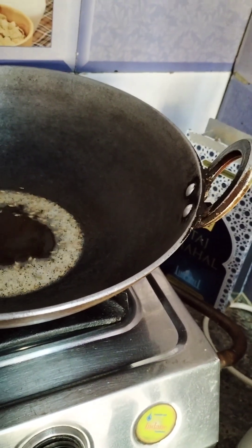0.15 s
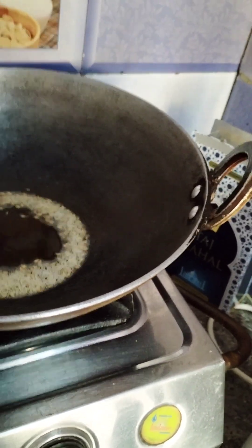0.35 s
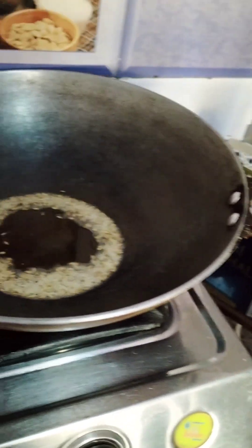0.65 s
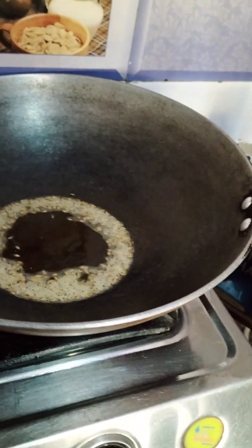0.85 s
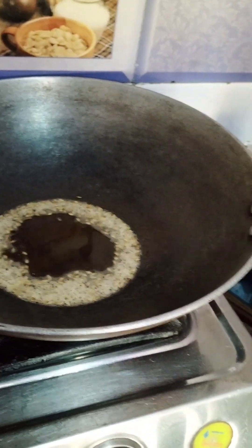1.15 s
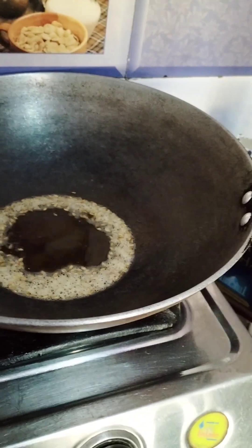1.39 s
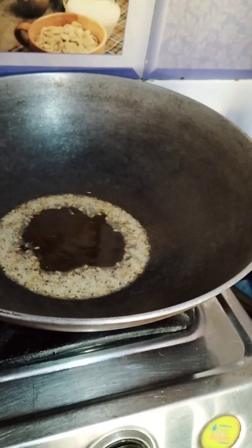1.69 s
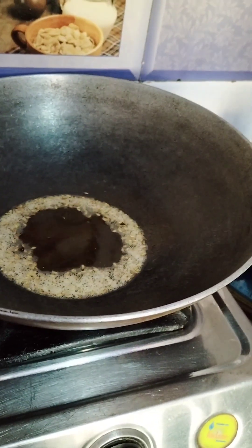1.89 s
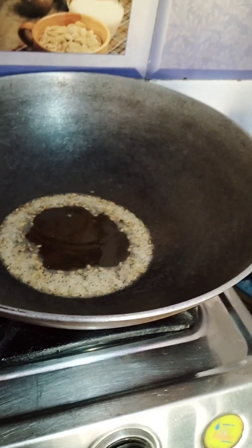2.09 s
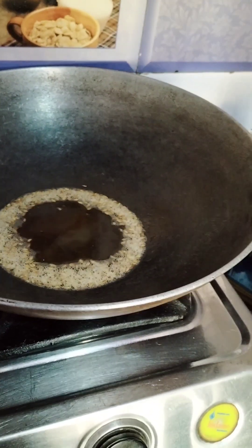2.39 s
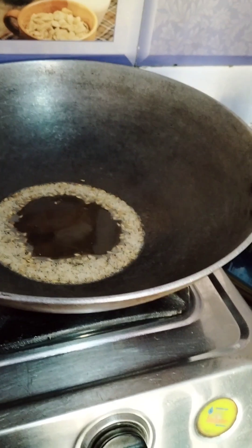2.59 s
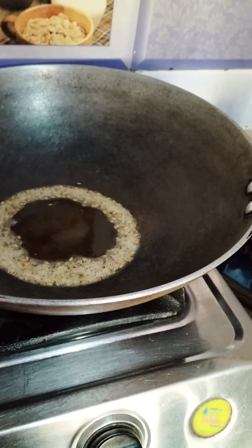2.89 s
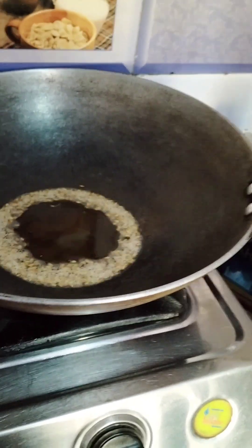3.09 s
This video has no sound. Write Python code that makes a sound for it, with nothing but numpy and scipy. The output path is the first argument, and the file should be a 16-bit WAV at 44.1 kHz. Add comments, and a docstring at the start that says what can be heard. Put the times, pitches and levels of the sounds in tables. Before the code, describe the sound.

Seeds pop and sputter in hot oil in a wide metal pan, lightly at first, then with sudden loud snaps and dull pan knocks, over soft hiss and a faint motor buzz, close phone microphone in a kitchen.

```python
"""Seeds pop in hot oil in a wide metal pan on a steel stove, close to a phone in a kitchen.
Throughout: shaped noise hisses for oil, burner and room, motor orders buzz, deep tones throb.
Light pops come first: clicks and noise sputter through pan resonances, with puffs of high droplet hiss.
A faint jolt at 0.25 s rings pan and stove modes over a noise thud; dull noise blips sound from 1.15 to 2.7 s.
Loud pops start at 1.2 s, stronger jolts at 1.38 s; loud pops return at 2.8 s, the hardest knocks from 2.9 s."""
import sys
import numpy as np
from scipy import signal
from scipy.fft import rfft, irfft, next_fast_len
from scipy.io import wavfile
from scipy.ndimage import uniform_filter1d, map_coordinates

SR = 44100
rng = np.random.default_rng(int(sys.argv[2]) if len(sys.argv) > 2 else 0)


def gain_from_db(level_db):
    """Turn a decibel level (scalar or array-like) into a linear amplitude factor."""
    decades = np.asarray(level_db, float) / 20
    return 10 ** decades


def inscribe(sig):
    """Save sig as 16-bit PCM at rate SR to the path in sys.argv[1].

    A 1-D sig is mono; a 2-D sig holds one channel per row.
    Samples are clipped to [-1, 1] before scaling.
    """
    pcm = np.round(np.clip(np.atleast_2d(sig).T, -1, 1) * 32767)
    wavfile.write(sys.argv[1], SR, pcm.astype(np.int16))


N = 143325


def unit(x):
    """Scale each row to rms 1."""
    return x / np.sqrt(np.mean(x ** 2, -1, keepdims=True) + 1e-20)


def along(points, hz):
    """Read a curve of (Hz, value) points on a log frequency axis."""
    f, v = np.transpose(points)
    return np.interp(np.log(hz + 1), np.log(f + 1), v)


def wobble(rate, count, size):
    """Rows of random drift: straight lines between normal draws, rate knots a second."""
    knots = rng.standard_normal((count, int(size * rate / SR) + 4))
    position = np.arange(size) * rate / SR
    return np.array([map_coordinates(k, [position], order=1) for k in knots])


def tinted(gain, count, size):
    """Rows of noise of rms 1, coloured by a gain per frequency."""
    spectrum = rfft(rng.standard_normal((count, size)))
    return unit(irfft(spectrum * gain(np.fft.rfftfreq(size, 1 / SR)), size))


def place(times, rows):
    """Mix each row in at its own time."""
    start = np.round(np.asarray(times) * SR).astype(int)[:, None]
    at = start + np.arange(rows.shape[1])
    return np.bincount(at.ravel(), rows.ravel(), N + SR)[:N]


def burst(t, t60):
    """The envelope of a burst: a quick rise, a short hold and an exponential fall."""
    rise_s, hold_s = 0.0004, 0.0055
    return (1 - np.exp(-t / rise_s)) * gain_from_db(-60 * np.maximum(t - hold_s, 0) / t60)


def hiss():
    """Oil, burner and room: coloured noise with faint random patches in time and pitch."""
    # noise colour: (frequency [Hz], relative density [dB])
    hiss_colour = [(25, -50), (55, -13), (85, -6), (130, -9.5), (220, -21.5), (300, -6), (450, -0.5),
                   (800, -4.5), (1270, -10.5), (1900, -15.5), (2970, -13), (3800, -13), (4530, -21),
                   (5590, -18), (7900, -20.5), (9300, -43), (12000, -38.5), (15600, -37)]
    level_db, patchy_db = -48, 1.5
    noise = tinted(lambda f: gain_from_db(along(hiss_colour, f)), count=1, size=N + 1024)[0]
    z = signal.stft(noise, nperseg=512)[2]
    patches = uniform_filter1d(rng.standard_normal(z.shape), 6, 0)  # smooth over pitch
    patches = uniform_filter1d(patches, 8, 1)  # smooth over time
    patchy = signal.istft(z * gain_from_db(patchy_db * patches / patches.std()), nperseg=512)[1][:N]
    return gain_from_db(level_db) * unit(patchy)


def rumble():
    """Deep tones of drifting level that throb against each other under the buzz."""
    # low tones: (frequency [Hz], mean peak level [dB])
    low_tones = [(72, -69), (91.5, -63), (102.5, -79)]
    hz, db = np.transpose(low_tones)[..., None]
    level = gain_from_db(db + 1.8 * wobble(4, count=len(hz), size=N))
    return (level * np.sin(2 * np.pi * hz * np.arange(N) / SR)).sum(0)


def motor():
    """A small motor: multiples of the shaft speed, each wavering a little, beat once a turn."""
    # buzz partials: (multiple of shaft speed, level over level_db [dB])
    orders = [(8, -15.5), (10, -0.5), (11, -15.5), (13, 2.5), (16, -3.5), (19, -48), (20, 3.5), (21, 3),
              (23, -10), (28, -13.5), (31, -4.5), (32, -4), (48, -11.5), (49, -1.5), (50, -6.5), (51, -9.5),
              (62, -11.5), (65, -19.5), (68, -13.5), (69, -19.5), (70, -9.5), (85, -12), (93, -8.5),
              (97, -14), (113, -11.5)]
    shaft_hz, start_s, level_db = 34.953, -0.0035, -55
    waver_db, spread_s = 0.7, 0.004
    order, db = np.transpose(orders)[..., None]
    turns = shaft_hz * (np.arange(N) / SR - start_s)
    lag = spread_s * shaft_hz * (order - 49.5) ** 2 / 60  # cycles; spreads each turn's pulse
    level = gain_from_db(level_db + db + waver_db * wobble(5, count=len(order), size=N))
    return np.sqrt(2) * (level * np.cos(2 * np.pi * (order * turns + lag))).sum(0)


def blips():
    """Short dull blips from the room: narrow noise that swells and fades."""
    # blips: (time [s], level [dB], centre [Hz], length [s])
    blip_list = [(1.147, -42.5, 506, 0.075), (1.929, -48, 954, 0.088), (2.052, -43, 555, 0.068),
                 (2.347, -49, 910, 0.046), (2.595, -39.5, 525, 0.12)]
    s, db, hz, length = np.transpose(blip_list)[..., None]
    progress = np.clip(np.arange(8192) / SR / length, 0, 1)
    tone = tinted(lambda f: 1 / (1 + ((f - hz) / 75) ** 2), count=len(s), size=8192)
    return place(s[:, 0], gain_from_db(db) * tone * np.sin(np.pi * progress ** 0.33))


def spits():
    """Fine droplets spit from the oil: short puffs of very high coloured noise."""
    # puffs: (time [s], level before trim_db [dB])
    puffs = [(0.043, -35), (0.152, -56), (0.1983, -56), (0.2675, -47), (0.316, -41), (0.4019, -54),
             (0.4777, -49), (0.501, -46), (0.578, -40), (0.6145, -32.5), (0.697, -44), (0.7108, -36),
             (0.7356, -44), (0.759, -38.5), (0.9342, -47.5), (1.049, -39), (1.091, -34), (1.212, -45),
             (1.3358, -46), (1.3517, -33.5), (1.385, -35.5), (1.47, -51), (1.705, -33), (1.8298, -35),
             (1.9823, -51), (2.1499, -52), (2.203, -47), (2.309, -36), (2.3889, -52), (2.4393, -50),
             (2.6423, -54), (2.6777, -52), (2.7595, -52), (2.846, -42.5), (2.8838, -53), (2.913, -40),
             (3.1816, -49)]
    # puff colour: (frequency [Hz], relative gain [dB])
    spray_colour = [(3000, -7), (8000, -16), (9500, -9.5), (11000, -9.5), (12000, -1), (13500, -9.5),
                    (15800, 1.5)]
    trim_db, t60_s = -3, 0.068
    s, db = np.transpose(puffs)[..., None]
    t = np.arange(8192) / SR
    spray = tinted(lambda f: gain_from_db(along(spray_colour, f)), count=len(s), size=len(t))
    return place(s[:, 0], gain_from_db(db + trim_db) * spray * burst(t, t60_s))


def knocks():
    """Jolts of the pan on its stand ring decaying modes, whose close deep pairs beat, over a noise thud."""
    # jolts: (time [s], strength [dB], sharpness [0-1], extra boom [dB], extra hollow ring [dB])
    jolts = [(0.2493, -23, 0.16, -8, -12), (1.3847, -20, 0.96, 4.5, -5.5), (1.416, -20, 0.23, -42, 3),
             (2.149, -19.5, 0.35, -7.5, -18), (2.186, -26.5, 0, -0.5, -6), (2.9116, -12.5, 0.6, 1, -5),
             (2.938, -16.5, 0.14, -12.5, 3.5), (3.1807, -12.5, 0.26, -1.5, -6.5), (3.192, -13, 0.1, -32, 2)]
    # pan and stove top modes: (frequency [Hz], level [dB], t60 [s])
    modes = [(76.5, -18.5, .28), (83, -18.5, .28), (152, -7, .3), (160.7, -7, .31), (239.6, -12.5, .15),
             (289, -15, 0.106), (446, -3.5, 0.16), (489.7, -4.5, 0.15), (559, -10, 0.12), (966, -6, 0.068),
             (1110, -3.5, 0.11), (1293, 0, 0.06), (1418, -13.5, 0.14), (1790, -19, 0.24),
             (2350, -10.5, 0.12)]
    # thud colour: (frequency [Hz], relative gain [dB])
    thud_colour = [(100, -6), (200, -2), (500, -1.5), (1300, 2.5), (1800, -4), (3000, 3), (5000, -13),
                   (8000, -43)]
    boom_hz, soft_hz = 200, 650  # boom lies below the first; blunt jolts lose what lies over the second
    rise_cycles, scatter_db = 0.5, 1
    thud_db, thud_t60_s, thud_rise_s = -6.5, 0.12, 0.00083
    s, db, sharp, boom_db, hollow_db = np.transpose(jolts)[..., None]
    t = np.arange(SR // 2) / SR

    def strike(f):
        """Gain with which each jolt drives a frequency."""
        blunt = 1 / (1 + (f / soft_hz) ** 4)
        extra_db = boom_db * (f < boom_hz) + hollow_db * (f > 400) * (f < 520)
        return (sharp + (1 - sharp) * blunt) * gain_from_db(extra_db)

    jitter = scatter_db * rng.standard_normal((len(s), len(modes)))
    ring = 0
    for k, (hz, mode_db, t60) in enumerate(modes):
        sign = (-1) ** (k * (hz < boom_hz))  # deep pairs start opposed, so they swell and throb
        fall = gain_from_db(mode_db + jitter[:, [k]] - 60 * t / t60)
        swell = 1 - np.exp(-t * hz / rise_cycles)
        ring = ring + sign * strike(hz) * fall * swell * np.sin(2 * np.pi * hz * t)
    thud = tinted(lambda f: strike(f) * gain_from_db(along(thud_colour, f)), count=len(s), size=len(t))
    lumps_db = 2.1 * wobble(120, count=len(s), size=len(t))
    thud = thud * gain_from_db(thud_db - 60 * t / thud_t60_s + lumps_db) * (1 - np.exp(-t / thud_rise_s))
    return place(s[:, 0], gain_from_db(db) * (ring + thud))


def pops(table):
    """A click, its slaps and a sputter of tiny cracks ring the pan's resonances and the pop's own pitch."""
    # pan resonances: (frequency [Hz], width [Hz], level [dB])
    bowl_modes = [(2650, 39, -2), (2937, 50, 10.5), (3280, 25, -2), (3620, 340, 6.5), (3923, 73, 13),
                  (4240, 50, 9), (5014, 84, 5.5), (5200, 160, -3), (5710, 790, 0), (7020, 830, -1.5),
                  (7970, 110, -5)]
    # the split and its slaps off the pan: (mean delay [s], mean level over the sputter [dB])
    slap_list = [(0, 14), (.0024, 18), (.0051, 16)]
    trim_db, below_db_per_oct = -14, 32  # the second: fall of the colour under the brightest pitch
    snap_db, snap_width_hz = 7, 130  # the pop's own pitch
    t60_s, tail_db, tail_t60_s = 0.066, -14, 0.21  # the tail is the kitchen's answer
    lumpy_db, grainy_db = 2, 3
    s, db, hz, fall_db = np.transpose(table)[..., None]
    t = np.arange(8192) / SR - 0.004  # 4 ms of lead, as the colouring spreads a little ahead
    f = np.fft.rfftfreq(8192, 1 / SR)

    def resonance(centre, width):
        """Complex band-pass response with a peak gain of 1."""
        return 1j * f * width / (centre * centre - f * f + 1j * f * width)

    # each pop excites each resonance differently
    share = gain_from_db(rng.normal(0, 3, (len(s), len(bowl_modes))))
    bowl = 1 + gain_from_db(snap_db) * resonance(hz, snap_width_hz)
    for k, (centre, width, gain_db) in enumerate(bowl_modes):
        bowl = bowl + share[:, [k]] * gain_from_db(gain_db) * resonance(centre, width)
    octs = np.log2((f + 1) / hz)
    below_db = below_db_per_oct * (octs + 0.22)
    above_db = -fall_db * np.maximum(octs - 0.15, 0)
    tilt_db = np.where(octs < -0.15, below_db, above_db)
    colour = bowl * gain_from_db(tilt_db) / (1 + (f / 8400) ** 24)

    lumps_db = lumpy_db * wobble(150, count=len(s), size=len(t))
    grain_db = grainy_db * wobble(1500, count=len(s), size=len(t))
    late = np.maximum(t, 0)
    envelope = unit(gain_from_db(lumps_db + grain_db)) * burst(late, t60_s)
    envelope = envelope + gain_from_db(tail_db) * burst(late, tail_t60_s)
    cracks = envelope * rng.standard_normal(envelope.shape)
    scatter = rng.standard_normal((len(s), len(slap_list), 2))
    for k, (lag, slap_db) in enumerate(slap_list):
        delay = lag * (1 + 0.18 * scatter[:, k, 0])
        at = np.round(SR * (delay - t[0])).astype(int)
        cracks[np.arange(len(s)), at] += gain_from_db(slap_db + 2 * scatter[:, k, 1])
    response = unit(np.abs(colour)) * np.exp(1j * np.angle(colour))  # level evened, phase kept
    body = irfft(rfft(cracks) * response, len(t))
    return place(s[:, 0] + t[0], gain_from_db(db + trim_db) * body)


def small_pops():
    """Faint pops, steeply dulled above their pitch, at random moments throughout, also under the loud ones."""
    per_s, floor_db = 11, -43.5  # the floor is before the trim in pops()
    u = rng.random((round(per_s * N / SR), 3))
    time_s = 0.014 + u[:, 0] * N / SR
    level_db = floor_db - 2.5 * np.log(u[:, 1])
    bright_hz = 3500 * 2 ** u[:, 2]
    return pops(np.transpose([time_s, level_db, bright_hz, np.full(len(u), 25)]))


def loud_pops():
    """Seeds bursting one by one, each with its own level and colour."""
    # bursts: (time [s], level before the trim in pops() [dB], brightest pitch [Hz], fall above it [dB/octave])
    seeds = [(0.0448, -27, 7830, 7), (0.1056, -23, 5250, 9), (0.1983, -32, 3550, 3),
             (0.2498, -24, 3560, 22), (0.2674, -26, 4600, 18), (0.3173, -31, 3860, -3),
             (0.4345, -21, 4300, 15), (0.4773, -33.5, 6960, 3), (0.5763, -24, 3900, 5),
             (0.6161, -22.5, 3740, -6.5), (0.696, -31.5, 3870, -5), (0.71, -23.5, 5050, -14),
             (0.7343, -20.5, 3720, -9.5), (0.7598, -25, 3900, -10), (0.932, -36.5, 5730, 6),
             (1.0478, -29.5, 4040, -5), (1.0623, -18, 4740, 37), (1.0915, -24, 4180, -9),
             (1.2109, -6.5, 3200, 20), (1.3115, -17.5, 5250, 8), (1.3361, -10, 3770, 15),
             (1.353, -19.5, 3250, -2), (1.3846, -6.5, 3280, 6.5), (1.4162, -17.5, 2800, 13),
             (1.469, -25, 4570, 11), (1.7075, -16, 4880, -6), (1.8024, -30.5, 4450, 14),
             (1.83, -28, 6600, 9), (1.9792, -30.5, 5400, -1), (2.119, -24.5, 6300, 40),
             (2.1485, -19.5, 3930, 4), (2.2997, -19, 5320, 6), (2.3703, -35.5, 7350, 10),
             (2.388, -18.5, 5600, 28), (2.4384, -16.5, 5960, 13), (2.58, -30, 5950, 5),
             (2.6428, -18, 4320, 15), (2.6768, -24, 5300, 17), (2.7598, -9.5, 4580, 21),
             (2.8476, -14.5, 4320, 7.5), (2.8823, -9.5, 4040, 10.5), (2.9112, -8, 3310, 11.5),
             (2.9381, -15.5, 3060, 21), (3.1809, -11, 3180, 11)]
    return pops(seeds)


def scene():
    """All sources, summed at one microphone."""
    background = hiss() + rumble() + motor() + blips()
    return (background + spits() + knocks() + small_pops() + loud_pops())[None]


def top_cut(x):
    """Nothing passes above the cut-off."""
    return signal.sosfilt(signal.butter(12, 17030, fs=SR, output="sos"), x)


def record(dry):
    """The phone loses the deepest bass to two first-order high-passes and all above its band limit."""
    low_hz, top_hz = 63, 15900
    size = next_fast_len(N + SR // 2)
    hz = np.fft.rfftfreq(size, 1 / SR)
    high_pass = (1j * hz / (low_hz + 1j * hz)) ** 2
    mix = irfft(rfft(dry, size) * (hz < top_hz) * high_pass, size)[:, :N]
    return top_cut(mix)


dry = scene()
out = record(dry)
inscribe(out)
```